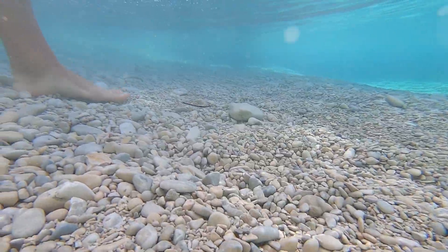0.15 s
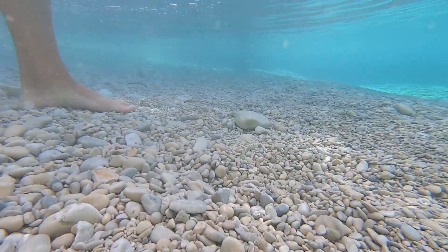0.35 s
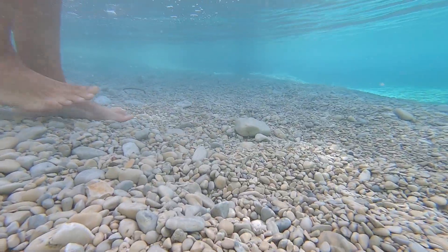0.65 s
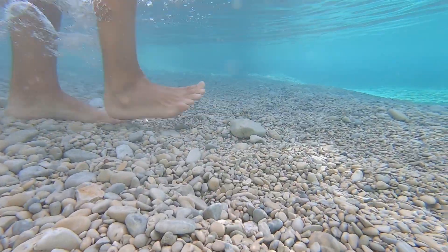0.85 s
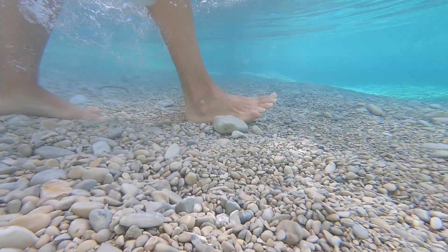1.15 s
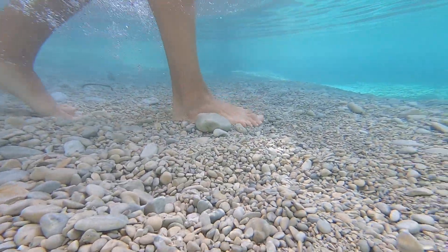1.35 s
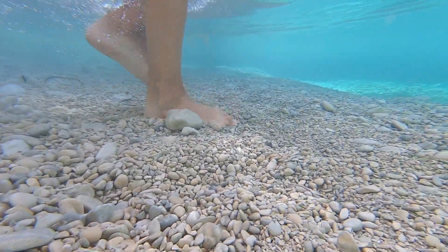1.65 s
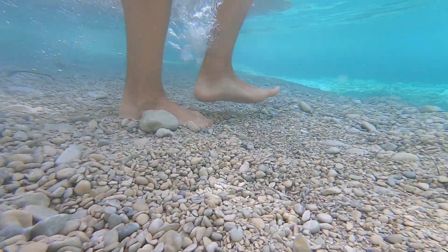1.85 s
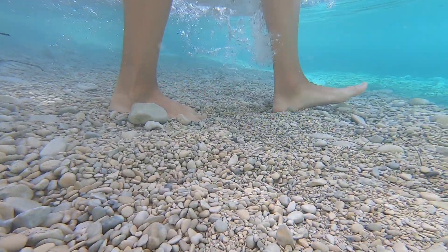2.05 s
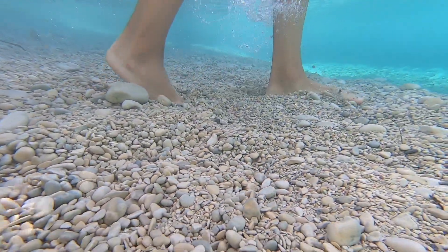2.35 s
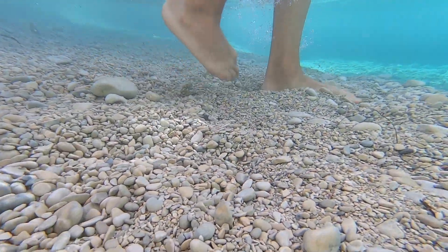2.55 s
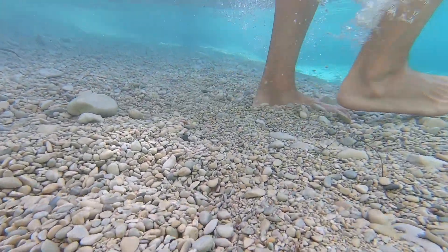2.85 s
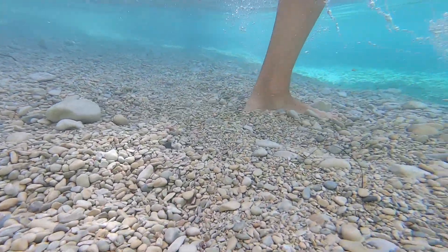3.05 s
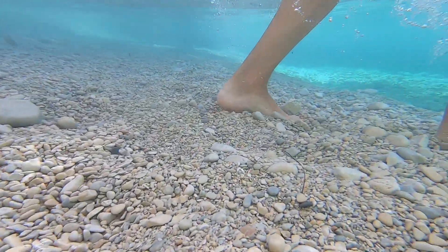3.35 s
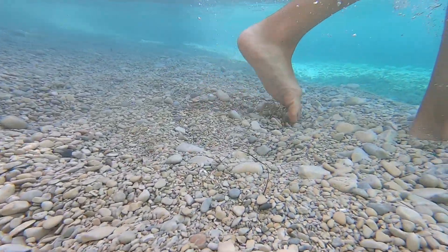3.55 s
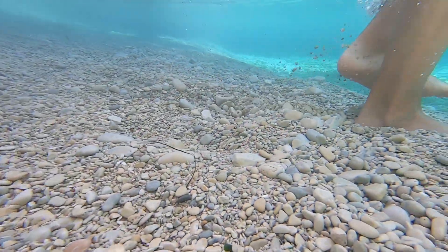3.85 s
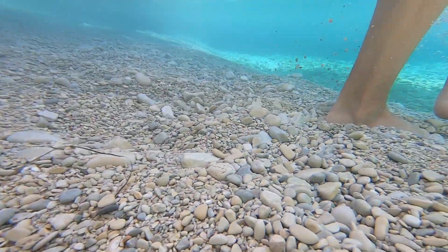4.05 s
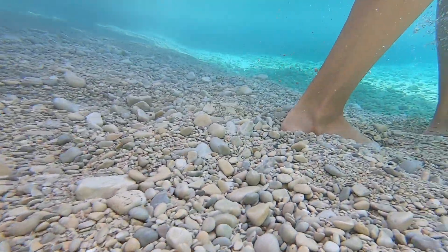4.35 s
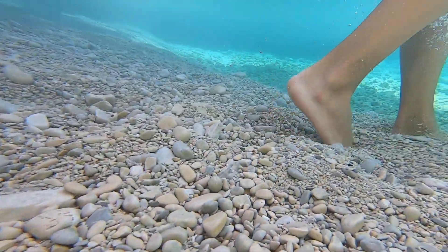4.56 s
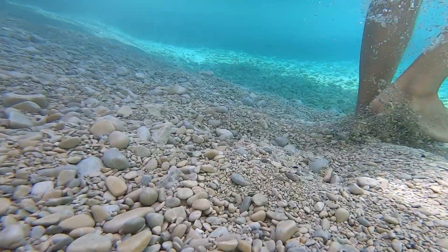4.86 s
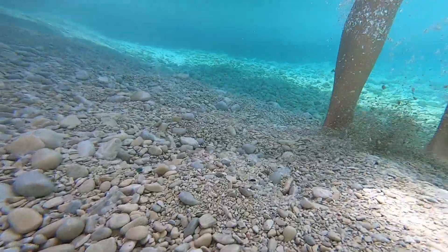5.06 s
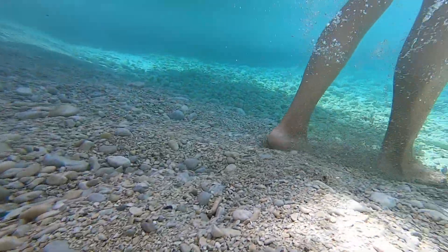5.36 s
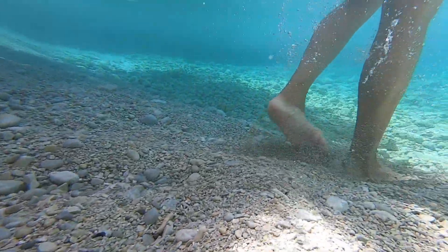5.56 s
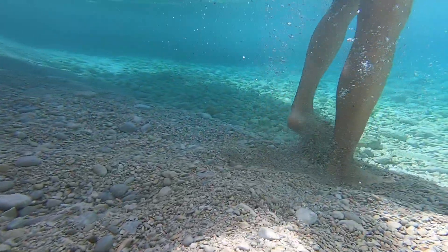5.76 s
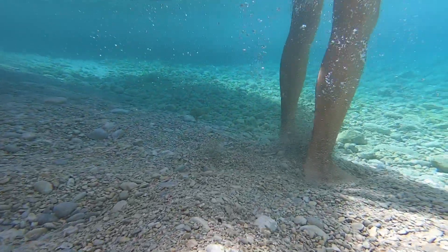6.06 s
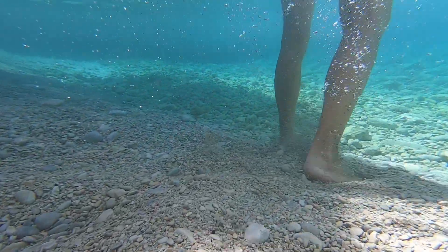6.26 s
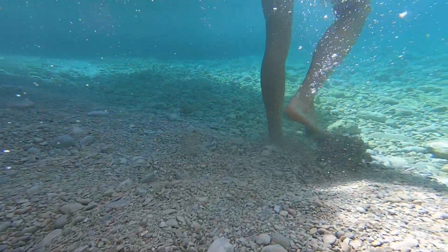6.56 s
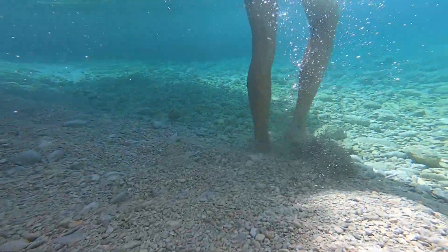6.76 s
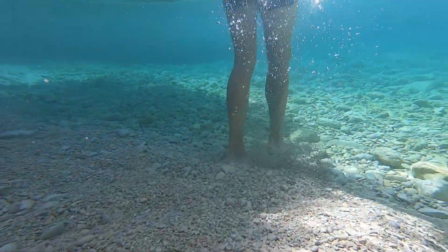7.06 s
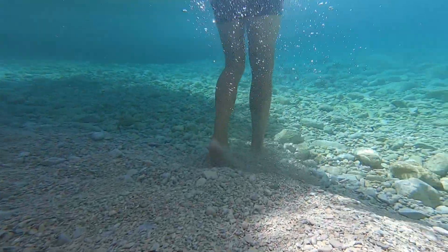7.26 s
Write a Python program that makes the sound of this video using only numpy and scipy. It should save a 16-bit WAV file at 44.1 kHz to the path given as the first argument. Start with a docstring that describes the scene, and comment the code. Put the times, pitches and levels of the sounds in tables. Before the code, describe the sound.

Bare feet tread a pebbly seabed, with small stone clicks and gritty hiss, then swelling low bubble gulps and a final run of hollow knocks.

```python
"""A low watery rumble with small gulps and plinks comes first, as legs wade through shallow sea, heard under water.
Each stride drags air down: big pockets throb near 260 Hz, middling bubbles gurgle, small ones churn near 1 kHz.
Bubbles are short swelling sine tones; moving water is filtered noise; faint ringing washes are crowds of tones.
Stones are filtered clicks and noise: pebbles clack, fine gravel hisses and tiny stones tick.
Dull knocks pair a hollow ring with a round thump; most of them come in a run near the end."""
import sys
import numpy as np
from scipy import signal
from scipy.fft import rfft, irfft, next_fast_len
from scipy.io import wavfile
from scipy.ndimage import uniform_filter1d

SR = 44100
rng = np.random.default_rng(int(sys.argv[2]) if len(sys.argv) > 2 else 0)


def wav_record(signal):
    """Record a signal, one row per channel, as 16-bit PCM in the file named by sys.argv[1]."""
    frames = np.transpose(np.atleast_2d(signal))
    bounded = np.clip(frames, -1, 1)
    # unit amplitude maps onto the largest positive 16-bit level
    quanta = np.round(bounded * 32767).astype(np.int16)
    wavfile.write(sys.argv[1], SR, quanta)


N = 326860
TIME = np.arange(N) / SR
# In every table, level_db is relative: the function that plays it may add its own level.


def gain_of(db):
    """Turns decibels into amplitude."""
    return 10 ** (np.asarray(db) / 20)


def curve(rows):
    """Draws straight lines between the points of a (time, value) table."""
    return np.interp(TIME, *np.transpose(rows))


def coloured(x, points):
    """Filters x by a spectrum drawn on a log-frequency axis."""
    hz, db = np.transpose(points)
    size = next_fast_len(len(x))
    f = np.fft.rfftfreq(size, 1 / SR)
    filter_db = np.interp(np.log(f + 1), np.log(hz), db)
    return irfft(rfft(x, size) * gain_of(filter_db), size)[:len(x)]


def steadied(x, size):
    """Evens out the power over about size samples, to about 1; faster flutter stays."""
    power = uniform_filter1d(uniform_filter1d(x ** 2, size), size)
    return x / np.sqrt(abs(power) + 1e-4 * np.mean(x ** 2))


def add(mix, s, sound):
    """Mixes a sound in at time s, in seconds."""
    part = mix[max(round(s * SR), 0):][:len(sound)]
    part += sound[:len(part)]


def impacts(per_s, spread_db):
    """Makes random impulses of either sign: many small, a few large."""
    chance, size = rng.random(N), np.minimum(rng.exponential(1, N), 4)
    happens = chance < per_s / SR
    return happens * gain_of(spread_db * size) * rng.choice([-1, 1], N)


def swell(u):
    """Envelope of a short tone, such as a bubble: grows to 1 at u = 1, then rings out."""
    return (u * np.exp(1 - u)) ** 2


def bubble_cloud(pitch_hz, count, scatter, rise_cycles, spread_db, size):
    """Bubbles start at random, each ringing a few cycles around the pitch given for that moment."""
    at = rng.integers(0, N, count)
    detune, loudness, phase = rng.standard_normal((count, 3)).T[:, :, None]
    hz = np.broadcast_to(pitch_hz, N)[at, None] * np.exp(scatter * detune)
    age = np.arange(size)  # samples
    turns = hz * age / SR
    tones = np.sin(2 * np.pi * (turns + phase))
    rings = gain_of(spread_db * loudness) * swell(turns / rise_cycles) * tones
    # Sum all the overlapping bubbles.
    return np.bincount((at[:, None] + age).ravel(), rings.ravel(), minlength=N)[:N]


def clumps(depth_db, per_s):
    """A gain that lurches at random, as stones or bubbles break loose in clumps."""
    knots = np.arange(0, TIME[-1] + 1, 1 / per_s)
    heights = rng.standard_normal(4096)[:len(knots)]
    return gain_of(depth_db * np.interp(TIME, knots, heights))


# Every push dies away by 20 dB in RELEASE_S (seconds) plus a share of its rise:
# slow pushes leave the water moving longer.
RELEASE_S, RELEASE_PER_RISE = 0.12, 1


def push(start, rise, hold):
    """Envelope of one movement: it builds, holds and dies away."""
    t = TIME - start
    release = RELEASE_S + RELEASE_PER_RISE * rise
    fade_db = -20 * np.maximum(t - rise - hold, 0) / release
    return np.clip(t / rise, 0, 1) * gain_of(fade_db)


def stirring(rows):
    """Power of each movement over time, and the columns that follow its timing."""
    power = np.array([push(*row[:3]) ** 2 for row in rows])
    return power, np.transpose(rows)[3:]


def strength(power, levels_db, calm_db):
    """Amplitude of overlapping movements, their power added to that of the calm level."""
    return np.sqrt(gain_of(levels_db) ** 2 @ power + gain_of(calm_db) ** 2)


# Strength of the water's rumble over time: start_s, level_db
FLOW_LEVEL = [(0.0, -40.5), (.22, -50.5), (.32, -41), (.82, -40), (.91, -54), (1.06, -40.5), (1.8, -37.5),
              (2.3, -37), (3.15, -44), (3.85, -42.5), (4.55, -41), (5.15, -48), (5.61, -32.5),
              (5.96, -48.5), (6.5, -46.5), (6.9, -45.5), (7.05, -37), (7.41, -47.5)]
# Tone of the moving water: pitch_hz, level_db
FLOW_COLOUR = [(10, -3.5), (27, -3), (48, -8.5), (98, -1.5), (125, -4.5), (165, -3.5), (250, -11.5),
               (600, -37.5), (2000, -77)]


def flow(level_db=-0.62):
    """Moving water rumbles low and heaves unevenly: filtered noise with a wandering gain."""
    rumble = steadied(coloured(rng.standard_normal(N), FLOW_COLOUR), size=8000)
    return rumble * clumps(depth_db=2.5, per_s=14) * gain_of(curve(FLOW_LEVEL) + level_db)


def glassy_echoes(x, count=20, echo_db=-9, span_s=0.022):
    """A few random short echoes give a hiss a fine, glassy colour."""
    when, sign = rng.random((2, count))
    taps = signal.unit_impulse(round(span_s * SR) + 2)  # the direct sound
    echo_at = 1 + (when * span_s * SR).astype(int)
    taps[echo_at] = np.sign(sign - .5) * gain_of(echo_db) / np.sqrt(count)
    return signal.oaconvolve(x, taps / np.linalg.norm(taps))[:N]


# Tone of the coarse grit, shared by crackle and gravel: pitch_hz, level_db
GRIT_COLOUR = [(1200, -23), (2400, -7.5), (2800, 4), (3250, 3.5), (3750, -7.5), (4350, 1), (5200, -10.5),
               (6200, -17), (10000, -29.5)]


def crackle(level_db=-9):
    """Now and then a larger grain snaps (a click) or chinks (a short ring) above the grit."""
    snaps = coloured(impacts(per_s=60, spread_db=4.0), GRIT_COLOUR)
    chinks = bubble_cloud(pitch_hz=3800, count=260, scatter=0.18, rise_cycles=12, spread_db=3.5, size=700)
    return gain_of(level_db) * (snaps / np.std(snaps) + 0.5 * chinks / np.std(chinks))


# A foot presses into the bed and shifts it: start_s, rise_s, hold_s, coarse_grit_level_db, fine_sand_level_db
TREADS = [(0.24, 0.024, 0.13, -72, -84.5), (0.47, 0.064, 0.018, -69, -74),
          (0.66, 0.098, 0.23, -73.5, -87.5), (1.02, 0.03, .015, -67.5, -84), (1.1, 0.07, 0.094, -70, -81),
          (1.25, 0.11, 0.079, -71, -72.5), (1.48, 0.026, 0.1, -71, -69), (1.64, 0.022, 0.18, -75, -75.5),
          (1.88, 0.071, 0.34, -72.5, -76.5), (2.19, 0.15, 0.043, -68, -70),
          (2.55, 0.056, 0.47, -76.5, -82.5), (3.1, 0.014, 0.15, -87, -78), (3.24, 0.16, 0.18, -84, -74.5),
          (3.75, 0.07, 0.043, -83, -87), (4.02, 0.078, 0.75, -82.5, -89.5), (4.68, 0.087, 0.15, -84, -84.5),
          (5.28, 0.13, 0.16, -77.5, -86), (5.75, 0.025, .04, -80, -91), (6.08, 0.36, 0.24, -81, -84.5),
          (6.95, 0.024, 0.26, -77, -90), (7.25, 0.019, 0.1, -71, -83)]
# Tone of the fine sand: pitch_hz, level_db
SAND_COLOUR = [(2000, -7), (4000, 4), (5450, 2.5), (6400, -5.5), (7600, -1.5), (8800, -6), (10000, -7.5),
               (10900, -21), (14000, -27)]
# Extra grit tone at the start, drifting evenly to its reverse at the end: pitch_hz, level_db
EARLY_GRIT_COLOUR = [(2850, 1.5), (3280, -3.5), (3800, -1.5), (4400, 2.5), (5700, -1.5)]


def gravel(grit_db=-2.5, sand_db=1.5, calm_grit_db=-87, calm_sand_db=-102):
    """Countless small collisions hiss where the feet stir the bed: filtered random impulses."""
    power, (coarse_db, fine_db) = stirring(TREADS)
    grit_hits = glassy_echoes(impacts(per_s=2100, spread_db=3.5))
    grit = steadied(coloured(grit_hits, GRIT_COLOUR), size=2200) + crackle()
    sand_hits = glassy_echoes(impacts(per_s=2700, spread_db=2.5))
    sand = steadied(coloured(sand_hits, SAND_COLOUR), size=1800)
    progress = TIME / TIME[-1]
    late_colour = [(hz, -db) for hz, db in EARLY_GRIT_COLOUR]
    grit = (1 - progress) * coloured(grit, EARLY_GRIT_COLOUR) + progress * coloured(grit, late_colour)
    grit = grit * strength(power, coarse_db + grit_db, calm_grit_db) * clumps(depth_db=3.5, per_s=21)
    sand = sand * strength(power, fine_db + sand_db, calm_sand_db) * clumps(depth_db=1.5, per_s=24)
    return grit + sand


# Tiny stones skittering: start_s, level_db, fade_s (time for the scrape to fall by 60 dB)
TICKS = [(0.282,-54,0.0092), (0.5192,-59,0.016), (0.545,-51,.006), (0.563,-51,0.0096), (1.029,-62,0.02),
         (1.041,-57,0.021), (1.051,-63,.02), (1.273,-52,0.008), (1.601,-43.5,0.0061), (2.356,-51.5,0.016),
         (3.113,-60.5,0.17), (3.129,-47.5,0.015), (3.151,-52,0.021), (3.162,-52,0.042), (3.205,-59,0.067),
         (3.2105,-47,0.019), (3.69,-57.5,0.018), (3.837,-58.5,0.011), (6.688,-63,.015), (7.274,-61,0.096)]
# Tone of the ticks: bright, with several narrow peaks: pitch_hz, level_db
TICK_COLOUR = [(2050, -2.5), (2600, -15.5), (3150, 4), (3750, -4.5), (4400, 3.5), (5150, 2), (5550, 3.5),
               (6000, -4), (6500, -8), (7400, -1.5), (8800, -12), (9900, -9), (10900, -27.5)]


def ticks(level_db=3, scrape=0.87, snap=3):
    """Tiny stones tick or skitter: a one-sample snap starts a short scrape of fading noise."""
    out, t = np.zeros(N), np.arange(4096) / SR
    for s, db, fade_s in TICKS:
        fade = np.exp(-np.log(1000) * t / fade_s)
        tick = scrape * fade * rng.standard_normal(len(t)) + snap * (t == 0)
        add(out, s, gain_of(db + level_db) * tick)
    return coloured(out, TICK_COLOUR)


# Pebble against pebble: start_s, level_db, treble_db (added to the high part of its tone)
CLACKS = [(0.4169,-37.5,-14.5), (0.499,-39.5,-13), (0.6139,-39,-15), (0.951,-46,-22), (1.0672,-27,-69),
          (1.077,-44,-22), (1.142,-49,-13), (1.269,-38,-3), (1.4455,-45,-12), (1.481,-48,-20),
          (1.8235,-37.5,-16), (1.909,-53,-13), (1.9423,-35,-19), (2.109,-36,-18), (3.0895,-39.5,-17),
          (3.3183,-40,-15), (5.2525,-51.5,-16), (5.5243,-52,-8.5), (5.786,-51,-16), (5.7982,-48,-14),
          (5.871,-49.5,-14), (5.8908,-49.5,-15), (6.0133,-44,-17), (6.96,-51.5,-7), (6.9823,-38,-12),
          (7.0573,-38,-11)]
# Tone of a pebble's click before treble_db is added: pitch_hz, level_db
CLACK_COLOUR = [(100, -20.5), (500, 0), (950, 14), (1700, 6.5), (2700, 0.5), (3300, 7.5), (3800, 8),
                (4400, 1.5), (5500, -12), (9000, -47.5)]


def clacks(level_db=9, bright_above_hz=3000):
    """Water damps the pebbles at once: each collision is one short pressure pulse."""
    out, pulse = np.zeros(N), signal.unit_impulse(512, "mid")
    for s, db, treble_db in CLACKS:
        colour = [(hz, c + treble_db * (hz > bright_above_hz)) for hz, c in CLACK_COLOUR]
        click = coloured(pulse, colour)
        click *= np.hanning(len(click)) / abs(click).max()
        crest = s + .001  # the middle of the pulse comes 1 ms after start_s
        add(out, crest - len(click) / 2 / SR, -gain_of(db + level_db) * click)
    return out


# Dull knocks: middle_of_ring_s, ring_level_db, thump_level_db, thump_pitch_hz
KNOCKS = [(1.8581, -18, -24.5, 297), (2.316, -20.5, -38, 300), (6.5612, -12, -21.5, 200),
          (6.687, -19, -20, 440), (6.7424, -12.5, -20, 182), (6.7663, -23, -18.5, 333),
          (6.816, -14.5, -22, 170), (6.8889, -13.5, -21, 188), (6.947, -16, -19.5, 223),
          (7.0105, -17.5, -20, 382)]
# The hollow ring of a knock: pitch_hz, level_db
KNOCK_COLOUR = [(20, -21.5), (110, -4.5), (250, -0.5), (450, 1), (600, -5.5), (780, -8), (930, -2.5),
                (1100, 4), (1300, -6.5), (1490, -11.5), (1650, -38), (2100, -38), (2500, -53), (4500, -86)]
# How late each pitch in the ring arrives (negative is early): pitch_hz, lag_s
KNOCK_LAG = [(200, .0016), (480, .0002), (750, -.0008), (1050, 0), (1350, .0006), (1650, -.0018)]


def knocks(level_db=0, thump_db=0, thump_rise_s=.0024, thump_lag_s=0.0029, sag=0.13):
    """Blunt, muffled taps: a ring with its pitches slightly staggered, then a round thump sinking in pitch."""
    out, size = np.zeros(N), 4096
    f = np.fft.rfftfreq(size, 1 / SR)
    lag = size / 2 / SR + np.interp(f, *np.transpose(KNOCK_LAG))
    # Summing the lags over frequency gives the phase that delays each pitch by its own lag.
    phase_turns = (np.cumsum(lag) - lag[0]) * SR / size
    chirp = irfft(np.exp(-2j * np.pi * phase_turns), size)
    ring = coloured(chirp, KNOCK_COLOUR) * np.hanning(size)
    u = np.arange(size) / SR / thump_rise_s
    for s, ring_db, low_db, hz in KNOCKS:
        add(out, s - size / 2 / SR, gain_of(ring_db + level_db) * ring / abs(ring).max())
        turns = np.cumsum(hz * np.exp(-sag * (u - 1))) / SR  # pitch is hz at the crest
        thump = swell(u) ** 2 * np.sin(2 * np.pi * turns)
        add(out, s + thump_lag_s - thump_rise_s, gain_of(low_db + thump_db) * thump)
    return out


# Faint ringing washes: start_s, rise_s, hold_s, level_db, first_pitch_hz, last_pitch_hz
RINGING_WASHES = [(0.0, .02, .05, -57.5, 1295, 1102), (0.672, 0.087, 0.048, -59.5, 1460, 1280),
                  (0.663, 0.046, .1, -75, 2010, 1700), (1.064, 0.011, 0.068, -65, 2020, 1590),
                  (1.07, .01, 0.074, -72, 2640, 2440), (1.177, 0.031, 0.1, -65.5, 1780, 1570),
                  (6.958, 0.045, 0.24, -79, 3250, 3130)]


def ringing_washes(level_db=0, scatter=0.064, rise_cycles=8, spread_db=3):
    """Faint ringing washes: many short overlapping tones in a narrow band, sinking in pitch."""
    out, t = np.zeros(N), np.arange(2048) / SR
    for start, rise, hold, db, first_hz, last_hz in RINGING_WASHES:
        wash, span = np.zeros(N), rise + hold + RELEASE_S
        when, phase = rng.random((2, 90))  # 90 tones in each wash
        variations = rng.standard_normal((len(when), 2))
        for w, p, (detune, loudness) in zip(when, phase, variations):
            hz = first_hz * (last_hz / first_hz) ** w * np.exp(scatter * np.tanh(detune))
            turns = t * hz
            tone = swell(turns / rise_cycles) * np.sin(2 * np.pi * (turns + p))
            add(wash, start + w * span, gain_of(spread_db * loudness) * tone)
        average = np.sqrt(np.sum(wash ** 2) / (span * SR))
        out += wash / average * push(start, rise, hold) * gain_of(db + level_db)
    return out


# Single loud bubbles: crest_s, level_db, pitch_hz (at the crest), length_s (a share of it is the rise)
BUBBLES = [(0.017, -41, 1260, .006), (0.037, -48, 1390, 0.014), (0.04, -34, 262, 0.012),
           (0.053, -45, 1314, 0.0096), (0.078, -44, 1345, 0.0073), (0.079, -52, 960, .005),
           (0.115, -36.5, 565, 0.016), (0.125, -41, 835, .007), (0.126, -47, 1030, .007),
           (0.148, -40, 902, 0.01), (0.198, -46, 614, 0.0085), (0.25, -46, 790, .008),
           (0.369, -28, 157, .026), (0.469, -53, 1350, 0.0059), (0.501, -38.5, 860, .007),
           (0.611, -30, 163, 0.031), (0.691, -48, 760, .008), (0.735, -47, 1360, .006),
           (0.757, -45, 1410, 0.012), (0.769, -43, 1200, 0.0063), (0.791, -36, 876, 0.0054),
           (0.805, -30.5, 174, 0.011), (0.826, -40, 540, .008), (0.851, -39, 570, 0.0088),
           (0.906, -31.5, 326, 0.0059), (0.942, -36, 865, .006), (0.951, -39, 1130, .006),
           (0.969, -39, 574, .008), (1.025, -37, 820, .007), (1.028, -39.5, 1234, 0.011),
           (1.051, -26.5, 1020, 0.0036), (1.166, -29.5, 910, 0.0045), (1.184, -27.5, 171, 0.023),
           (1.199, -35.5, 560, 0.0097), (1.37, -43, 1190, 0.0064), (1.38, -30, 212, 0.014),
           (1.404, -26.5, 189, 0.016), (1.558, -26, 177, 0.018), (1.728, -26, 192, 0.012),
           (1.918, -39, 1430, 0.0035), (1.972, -29, 1055, 0.0042), (2.088, -21.5, 1070, 0.0048),
           (2.152, -19.5, 460, 0.0054), (2.198, -22, 225, 0.01), (2.293, -25, 380, 0.0079),
           (2.414, -23, 400, 0.0084), (2.434, -20.5, 497, 0.0059), (2.432, -19.5, 301, .02),
           (2.463, -18, 246, 0.022), (2.515, -22, 283.5, .014), (2.659, -28, 910, .006),
           (2.674, -21, 253, 0.017), (2.753, -22.5, 936, .006), (2.785, -15, 283, 0.013),
           (2.804, -15, 293, .024), (2.826, -22.5, 855, 0.0057), (2.827, -21.5, 466, .005),
           (2.845, -17.5, 243, 0.013), (2.918, -17, 263, 0.0088), (2.943, -15, 276, 0.015),
           (2.982, -11, 257.6, 0.018), (3.098, -27, 546, 0.0045), (3.1, -13.5, 249, .007),
           (3.119, -19, 255, 0.0086), (3.225, -34.5, 516, .008), (3.325, -31, 860, .007),
           (3.506, -37, 1166, 0.0057), (3.607, -40, 920, .007), (3.77, -34.5, 1120, 0.0024),
           (3.774, -40.5, 1290, 0.012), (3.79, -32.5, 558, 0.005), (3.844, -26, 894, 0.0034),
           (3.855, -12.5, 299, .014), (3.895, -16, 224, 0.013), (4.052, -30, 480, 0.0074),
           (4.277, -27.5, 855, 0.00523), (4.365, -17, 267, 0.0085), (4.396, -22, 291, 0.011),
           (4.456, -14.5, 290, 0.015), (4.487, -13.5, 236, 0.015), (4.512, -25, 855, .007),
           (4.553, -18, 249, 0.013), (4.59, -21, 235, 0.0099), (4.63, -16, 271, 0.016),
           (4.703, -18.5, 257, .01), (4.766, -15.5, 251, 0.0084), (4.793, -15, 239, 0.0083),
           (4.838, -26.5, 900, 0.0028), (4.852, -27, 950, .007), (4.944, -52, 2120, 0.006),
           (4.945, -66, 4300, .004), (4.903, -18.5, 220, 0.015), (4.95, -18.5, 263.5, .02),
           (5.083, -29.5, 860, .007), (5.177, -26, 553, 0.0074), (5.182, -15, 232, 0.014),
           (5.236, -29, 250, .014), (5.312, -25.5, 910, 0.0031), (5.451, -10, 254.4, .023),
           (5.48, -13, 295.5, .026), (5.528, -12, 265, .013), (5.605, -16, 262.4, 0.014),
           (5.643, -14, 291, 0.011), (5.804, -25.5, 295, .016), (5.852, -22, 254, 0.0097),
           (5.88, -27.5, 524, 0.0065), (5.93, -23, 250, .014), (5.968, -44, 860, .007),
           (6.117, -29, 258, 0.013), (6.213, -28, 248, 0.016), (6.373, -19.5, 420, 0.0044),
           (6.472, -18.5, 280, 0.0066), (7.007, -16.5, 400, .014), (7.099, -53.5, 1690, 0.0092),
           (7.174, -19.5, 418, .015), (7.2, -25, 980, .006)]


def loud_bubbles(level_db=-1.0, rise_share=0.7294, glide=0.055):
    """Single gulps and plinks: swelling sine tones whose pitch lifts a little as each bubble rises."""
    out = np.zeros(N)
    for s, db, hz, length in BUBBLES:
        rise = rise_share * length
        t = np.arange(0, 6 * rise, 1 / SR)
        turns = np.cumsum(hz * (1 + glide * (t / rise - 1))) / SR
        tone = np.sin(2 * np.pi * (turns + rng.random()))
        add(out, s - rise, gain_of(db + level_db) * swell(t / rise) ** 2 * tone)
    return out


# Tone of the small bubbles, shared by stray_bubbles and churn: pitch_hz, level_db
CHURN_COLOUR = [(300, -14), (560, -0.5), (670, -2), (780, 2.5), (870, 9), (980, 3.5), (1060, 7.5),
                (1150, -1.5), (1260, 2.5), (1400, -6.5), (1510, -15.5), (1680, -36), (2600, -48.5),
                (4000, -64.5)]


def stray_bubbles(drive, level_db=-53, follow=0.67):
    """Sparse separate blips follow the churn only partly, so they stand out more in calm water."""
    cloud = bubble_cloud(pitch_hz=898, count=420, scatter=.45, rise_cycles=2.8, spread_db=0.5, size=1400)
    cloud = coloured(cloud, CHURN_COLOUR)
    stir_db = 20 * np.log10(drive)
    return cloud / np.std(cloud) * gain_of(level_db + follow * (stir_db - stir_db.mean()))


# Tone of the finest bubbles: pitch_hz, level_db
FROTH_COLOUR = [(900, -6), (1550, -2), (1850, -14.5), (2040, -4), (2350, -12), (2600, -20), (4000, -36)]


def froth(drive, level_db=0):
    """The finest bubbles fizz faintly: thousands of very short tones."""
    cloud = bubble_cloud(pitch_hz=1740, count=7000, scatter=0.19, rise_cycles=1.0, spread_db=0.5, size=500)
    return steadied(coloured(cloud, FROTH_COLOUR), size=2000) * drive * gain_of(level_db)


def churn(drive, level_db=-1, coarsening=0.12):
    """Small bubbles rush from the surface around the shins; a harder push tears off larger, lower ones."""
    pitch_hz = 1060 * (drive / np.median(drive)) ** -coarsening
    cloud = bubble_cloud(pitch_hz, count=4800, scatter=.34, rise_cycles=1.97, spread_db=0.0, size=600)
    return steadied(coloured(cloud, CHURN_COLOUR), size=1500) * drive * gain_of(level_db)


# Tone of the middling bubbles: pitch_hz, level_db
GURGLE_COLOUR = [(150, -14), (330, -1), (480, -1), (580, -2.5), (670, -12), (800, -11.5), (1300, -29.5),
                 (2000, -53)]


def gurgle(drive, level_db=-0.27):
    """The pockets break into middling bubbles, which ring between the pockets and the churn."""
    cloud = bubble_cloud(pitch_hz=470.0, count=1500, scatter=0.33, rise_cycles=1.46, spread_db=0.5, size=1200)
    return steadied(coloured(cloud, GURGLE_COLOUR), size=1800) * drive * gain_of(level_db)


# Tone of the big air pockets: pitch_hz, level_db
POCKET_COLOUR = [(60, -19), (125, -8), (170, 1.5), (215, -2), (265, -1), (330, 0), (420, -7), (600, -13),
                 (1200, -40.5), (2000, -70.5)]


def air_pockets(drive, pitch_hz, level_db=-1):
    """Big pockets of air throb behind the calves: low tones that ring for a few cycles."""
    cloud = bubble_cloud(pitch_hz, count=1100, scatter=0.17, rise_cycles=1.28, spread_db=2.0, size=2400)
    return steadied(coloured(cloud, POCKET_COLOUR), size=1100) * drive * gain_of(level_db)


# A leg pushes through the water and drags air down: start_s, rise_s, hold_s, big_pockets_level_db,
# middling_bubbles_level_db, small_bubbles_level_db, finest_bubbles_level_db, pocket_pitch_hz
SURGES = [(0.0, 0.015, 0.075, -51, -51, -50.5, -64.5, 275),
          (0.1, 0.042, 0.078, -55, -53.5, -61.5, -70.5, 315),
          (0.28, .06, 0.061, -44.5, -54.5, -62.5, -69, 178.6),
          (0.48, 0.038, 0.063, -38, -50, -55.5, -66.5, 185),
          (0.73, 0.1, 0.15, -47, -53.5, -47.5, -63.5, 223.5),
          (0.94, 0.11, .19, -39, -48.5, -48.5, -64, 209), (1.3, 0.067, .39, -37.5, -49, -51, -65.5, 212),
          (1.835, 0.0095, 0.013, -37.5, -44.5, -42, -66, 197.2),
          (1.9, 0.073, .19, -37, -46, -41, -59, 218.4), (2.19, 0.098, 0.11, -31.5, -35, -47.5, -64, 252),
          (2.37, 0.068, .09, -31, -39.5, -34.5, -62, 261), (2.55, 0.2, 0.06, -28, -38.5, -32, -60, 287.5),
          (2.88, 0.055, 0.075, -25.5, -39.5, -39, -60, 281.3),
          (3.06, 0.02, 0.017, -38, -38, -48.5, -63, 256), (3.19, 0.022, 0.092, -36.5, -47, -51, -73, 244),
          (3.39, 0.05, 0.16, -31.5, -45, -51.5, -67, 194.3),
          (3.825, 0.018, 0.033, -24.5, -36.5, -34, -66, 278.6),
          (3.97, 0.023, 0.04, -29, -36, -45, -65.5, 252.6),
          (4.08, .05, .07, -32.5, -55.5, -41.5, -62.5, 191.5),
          (4.18, 0.24, 0.19, -23.5, -35.5, -37.5, -67.5, 240.6),
          (4.68, 0.027, 0.069, -32.5, -32.5, -42, -68.5, 241.3),
          (4.83, 0.028, 0.06, -24.5, -30, -35.5, -62.5, 232),
          (5.15, 0.012, 0.065, -29, -40.5, -39.5, -65, 242.7),
          (5.31, 0.16, 0.088, -19.5, -30.5, -33.5, -63, 265.7),
          (5.73, .04, 0.043, -30.5, -39.5, -40, -69, 261.2),
          (5.91, 0.022, .05, -36, -40.5, -54.5, -94, 272.7),
          (6.04, 0.14, 0.21, -43.5, -58, -44.5, -69, 243.6), (6.28, 0.14, 0.06, -39, -39, -42.5, -67, 329),
          (6.49, 0.048, 0.14, -32.5, -33, -35.5, -66.5, 359),
          (6.75, 0.014, 0.02, -47, -36.5, -44, -73, 385.6),
          (6.98, 0.019, 0.11, -30.5, -29.5, -39.5, -75, 372),
          (7.11, .055, 0.038, -36, -28.5, -33.5, -68, 393),
          (7.26, 0.15, .05, -28.5, -36.5, -40.5, -69, 278)]


def wading(calm_pockets_db=-48, calm_gurgle_db=-65.5, calm_churn_db=-63, calm_froth_db=-79, build_db_per_s=2.5):
    """Surges drive bubbles of all sizes; between them the water grows busier as air collects in it."""
    power, (pockets_db, gurgle_db, churn_db, froth_db, pocket_hz) = stirring(SURGES)
    build_db = build_db_per_s * TIME
    # The strongest surge of the moment pulls the pocket pitch most.
    weight = power + 1e-9
    pitch_hz = pocket_hz @ weight / weight.sum(0)
    big = strength(power, pockets_db, calm_pockets_db)
    middling = strength(power, gurgle_db, calm_gurgle_db + build_db)
    small = strength(power, churn_db, calm_churn_db + build_db)
    finest = strength(power, froth_db, calm_froth_db)
    lurch = clumps(depth_db=1.1, per_s=17)
    rush = lurch * (air_pockets(big, pitch_hz) + gurgle(middling) + churn(small))
    return rush + froth(finest) + stray_bubbles(small)


def scene():
    """Adds up the water, the stones and the faint ringing in one channel."""
    water = flow() + loud_bubbles() + wading()
    stones = gravel() + ticks() + clacks() + knocks()
    return (water + stones + ringing_washes())[None]


EDGE_HZ = 14100  # middle of the filter's cutoff slope


def record(dry):
    """A low-pass filter removes the treble above about EDGE_HZ."""
    low_pass = signal.firwin(511, EDGE_HZ, window=("kaiser", 9), fs=SR)
    return signal.oaconvolve(dry, low_pass[None], "same")


dry = scene()
out = record(dry)
wav_record(out)
```